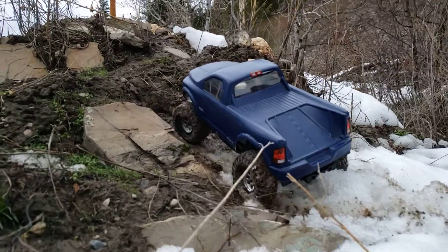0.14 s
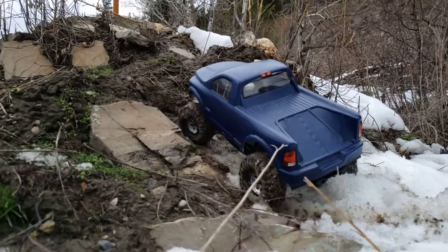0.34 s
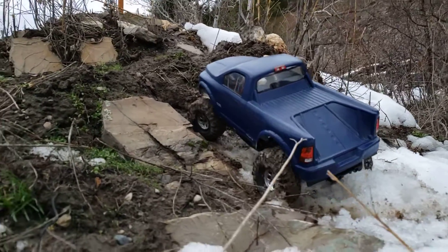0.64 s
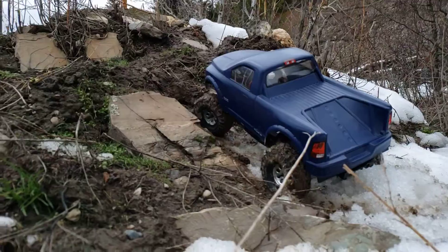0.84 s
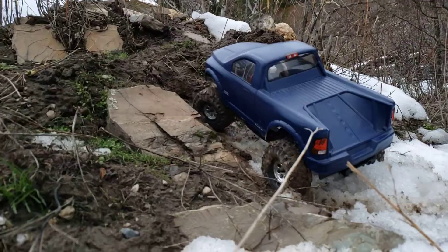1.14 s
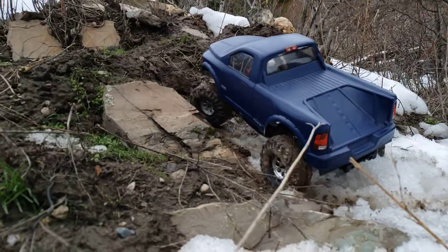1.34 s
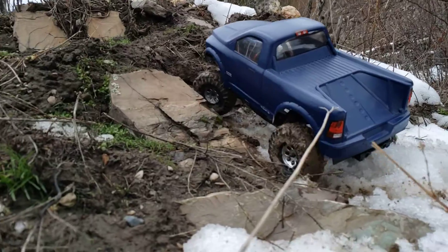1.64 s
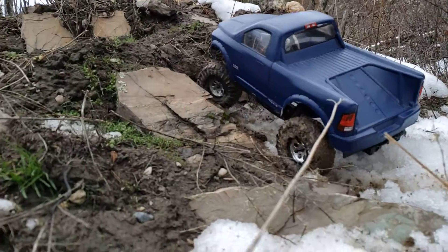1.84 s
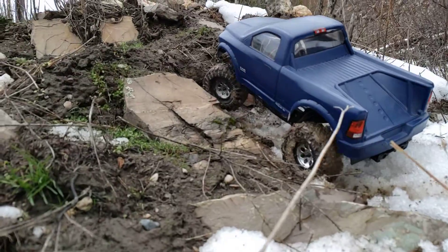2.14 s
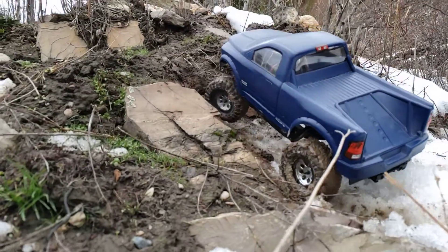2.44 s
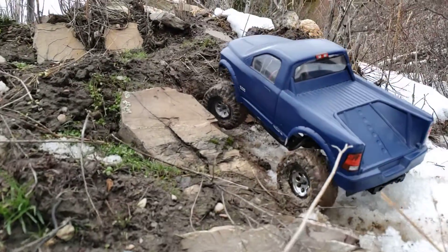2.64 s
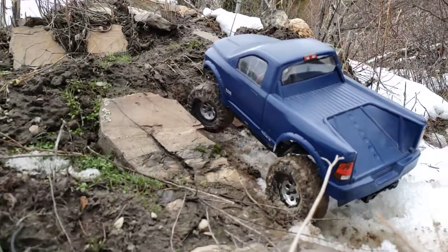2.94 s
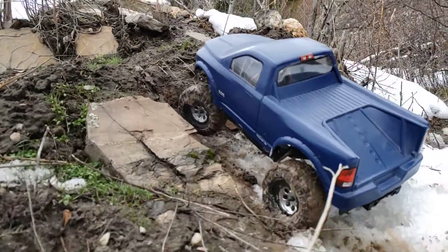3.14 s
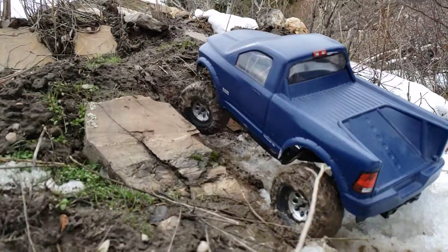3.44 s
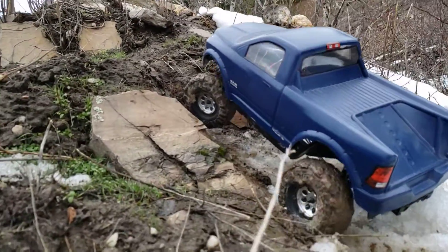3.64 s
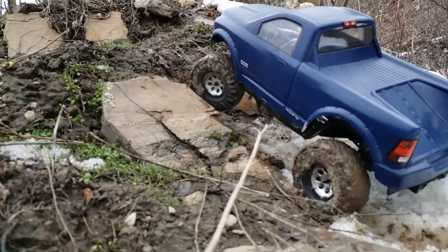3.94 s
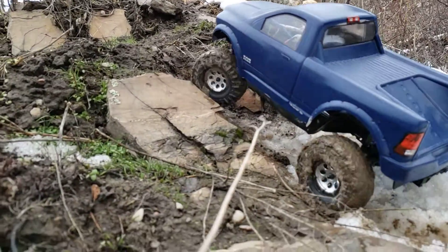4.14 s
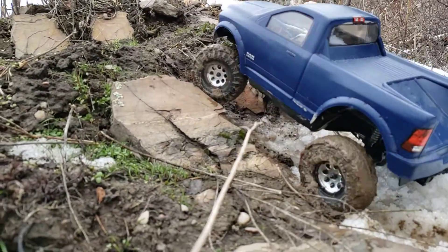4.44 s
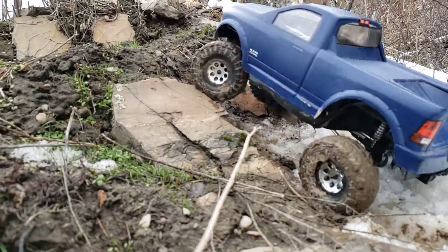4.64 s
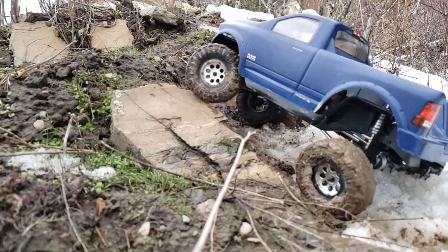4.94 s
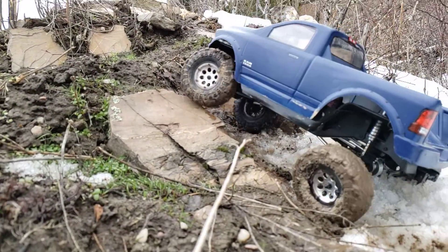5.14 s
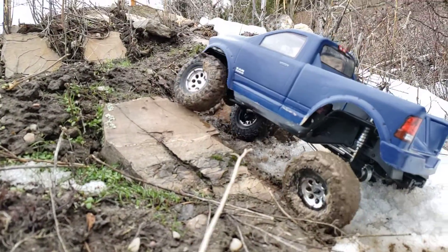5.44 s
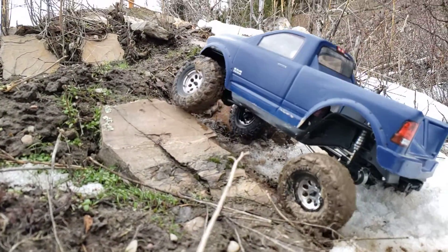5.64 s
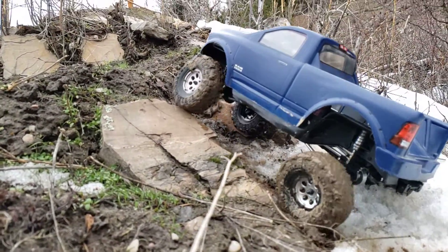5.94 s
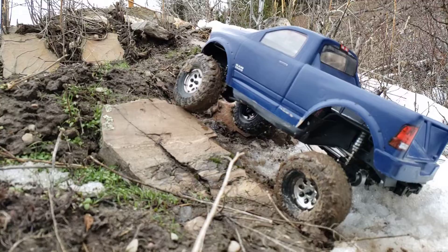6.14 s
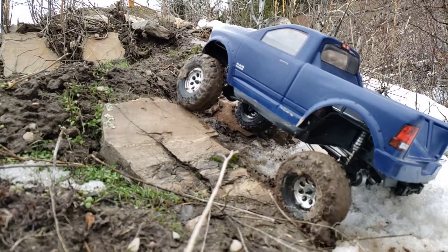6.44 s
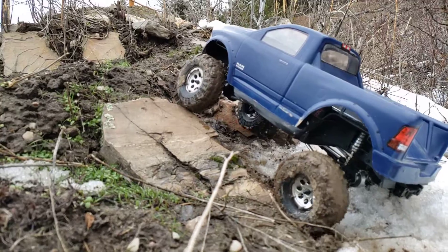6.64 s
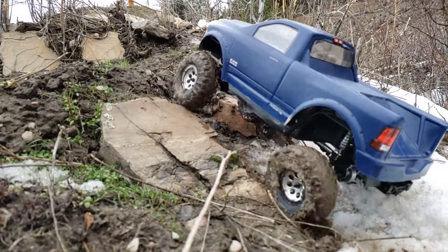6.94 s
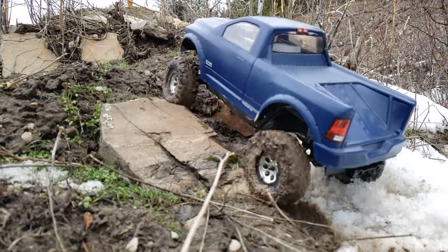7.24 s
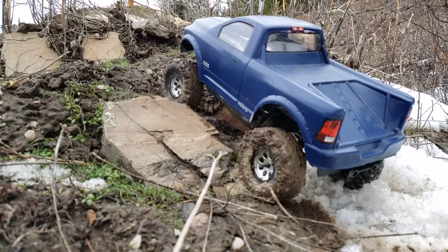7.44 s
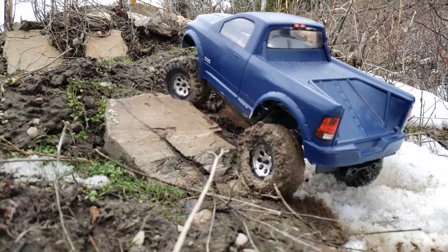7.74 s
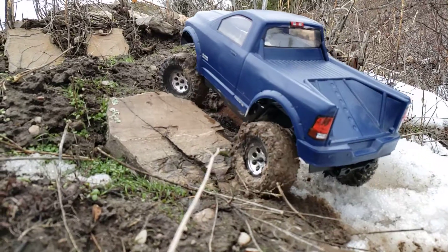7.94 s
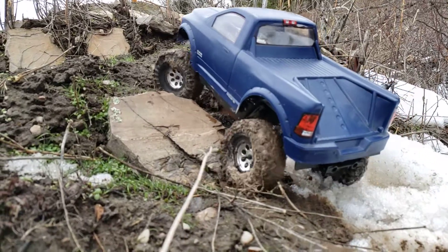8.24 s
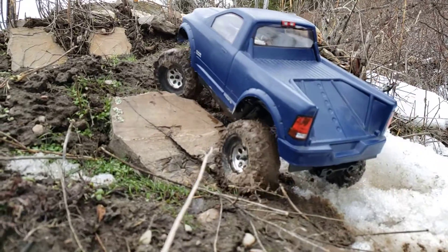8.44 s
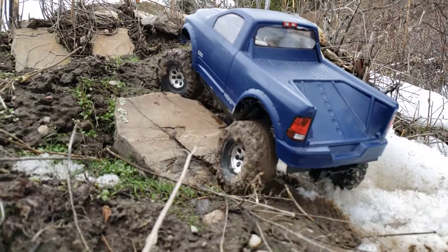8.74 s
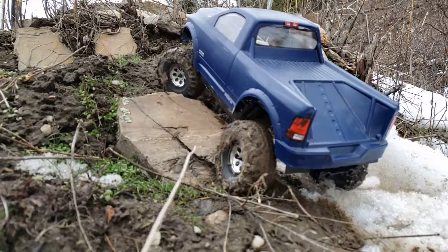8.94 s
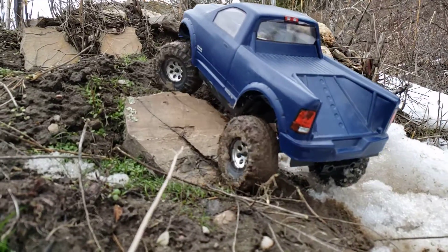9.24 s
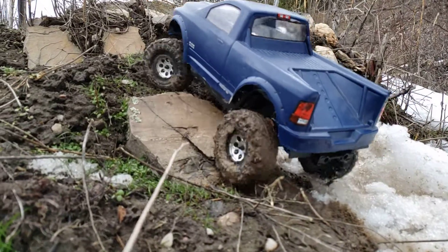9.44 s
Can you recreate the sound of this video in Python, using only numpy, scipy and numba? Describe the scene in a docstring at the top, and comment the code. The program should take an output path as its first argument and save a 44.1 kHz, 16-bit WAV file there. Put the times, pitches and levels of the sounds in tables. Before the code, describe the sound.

Close gritty gear whine of a toy crawler truck rises and sags in jerks, racing twice as tyres slip, with faint open-air rumble behind.

```python
"""Model truck on a rocky bank

A small electric model truck crawls up a muddy, rocky bank, close by. A moving tooth rate drives sine partials for the
whining gears and gated noise for their rattling case; every lurch of the drive train gives a short gritty rasp.
The motor can rings as band-passed noise, the speed controller sings at 1 kHz, and tyres scrub and knock on stone.
A far engine drones on two low sines under the coloured noise of the open air."""
import sys
import numpy as np
from scipy import signal
from scipy.fft import rfft, irfft
from scipy.io import wavfile
from scipy.ndimage import uniform_filter1d
from numba import njit

SR = 44100
rng = np.random.default_rng(int(sys.argv[2]) if len(sys.argv) > 2 else 0)


def transcribe(signal):
    """Save signal, clipped to [-1, 1], as a 16-bit WAV file at the path in sys.argv[1]."""
    frames = np.atleast_2d(signal).T
    limited = np.clip(frames, -1, 1)
    pcm = np.round(limited * 32767).astype(np.int16)
    wavfile.write(sys.argv[1], SR, pcm)


N = 422478
T = np.arange(N) / SR
CRAWL_HZ = 318.4  # tooth rate at crawling speed

# lurches of the drive train: t/s, relative strength/dB
LURCHES = [(0.108, 4.5), (0.157, -7), (0.212, 0.5), (0.254, 4.0), (0.386, -1), (0.576, 0.5), (0.736, 3),
           (0.796, -3.5), (0.905, 3), (0.95, -10), (1.062, 1), (1.24, 2.5), (1.359, 1.5), (1.502, 2),
           (1.55, 3), (1.62, 5), (1.686, -1.5), (1.779, 3), (1.827, -14), (1.888, -5), (1.947, -2),
           (2.0, -2), (2.031, 2.5), (2.202, 1.5), (2.358, -6), (2.527, 4.5), (2.7, 6.5), (2.807, -7),
           (2.857, 3), (2.968, 3), (3.143, 7), (3.332, -5), (3.389, -2.5), (3.507, 0.5), (3.939, -5.0),
           (3.991, -13), (4.039, 2.5), (4.088, 0.0), (4.177, 5.5), (4.222, -2), (4.269, -5.5), (4.309, 1),
           (4.358, 0), (4.404, -6), (4.453, 5), (4.563, 8), (4.681, 7), (4.783, 4.5), (4.892, 8),
           (4.932, 1), (4.981, -1), (5.028, 3.5), (5.152, 1), (5.201, 0), (5.37, 4), (5.579, 4.5),
           (5.639, -2), (5.781, 2.0), (5.846, -3.5), (5.983, 0.5), (6.034, -7), (6.097, -13), (6.161, 3),
           (6.288, -4.5), (6.357, -2), (6.468, -4.5), (6.557, -1), (6.659, 4), (6.728, -7), (6.771, -1),
           (6.804, 4), (6.853, -7), (6.892, -1), (6.927, 6.5), (6.991, 6), (7.068, 6), (7.143, 4.5),
           (7.215, 2.5), (7.29, 6), (7.378, 5), (7.86, -2), (7.959, -2.0), (8.013, 1), (8.069, -11),
           (8.107, 2), (8.164, -2), (8.22, -4), (8.263, 5), (8.374, 8), (8.487, 2), (8.636, 0.5),
           (8.801, 4), (8.846, 1), (8.925, 5), (8.999, 4.5), (9.133, 5), (9.208, 3.5), (9.296, 7),
           (9.379, 6), (9.447, 7.5), (9.52, -1)]


def undb(db):
    """Decibels to gain."""
    return 10 ** (np.asarray(db) / 20)


def unit(x):
    """Scale to rms 1."""
    return x / np.sqrt(np.mean(x ** 2))


def curves(table):
    """The columns of a time table, interpolated at every sample."""
    s, *columns = np.transpose(table)
    return [np.interp(T, s, c) for c in columns]


def walk(rate):
    """Smooth random wander with spread near 1, heading for a new value `rate` times a second."""
    k = int(SR / rate)
    steps = np.repeat(rng.standard_normal(N // k + 1), k)
    return 1.3 * uniform_filter1d(uniform_filter1d(steps, k), k)[:N]


def outline(hz, points):
    """Gain of a (Hz, dB) outline at the given frequencies, straight over log frequency."""
    at, db = np.transpose(points)
    return undb(np.interp(np.log(hz), np.log(at), db))


def colour(x, points):
    """Filter by a (Hz, dB) outline."""
    bins_hz = np.fft.rfftfreq(N, 1 / SR) + 1  # 1 Hz up, to keep the log finite
    return irfft(rfft(x) * outline(bins_hz, points), N)


def air_noise(apart_hz):
    """Noise at two ports: alike in the bass, unrelated well above apart_hz."""
    mid, side = rfft(rng.standard_normal((2, N)))
    alike = .97 / (1 + (np.fft.rfftfreq(N, 1 / SR) / apart_hz) ** 3)
    mid = mid * np.sqrt((1 + alike) / 2)
    side = side * np.sqrt((1 - alike) / 2)
    return irfft(np.array([mid + side, mid - side]), N)


def pan(left_db):
    """Gains of the two channels, the left one left_db above the right."""
    return undb(np.array([[left_db], [-left_db]]) / 2)


def ports(x):
    """The truck is to the right, and each port hears its treble with another colour."""
    # treble tilt between the ports: f/Hz, left minus right/dB
    port_tilt = [(2000, -6), (5000, -5.5), (7000, -15), (9500, 3), (11500, -3), (14000, -10.5)]
    return np.array([colour(c, [(hz, side * db / 2) for hz, db in port_tilt]) for c, side in zip(x, (1, -1))])


@njit
def svf(x, hz, width):
    """Band-pass whose centre may move every sample."""
    y, band, low = np.empty(len(x)), 0., 0.
    for i in range(len(x)):
        g, k = np.tan(np.pi * min(hz[i] / SR, .45)), width / hz[i]
        v = (band + g * (x[i] - low)) / (1 + g * (g + k))
        band, low, y[i] = 2 * v - band, low + 2 * g * v, k * v
    return y


def resonate(x, hz, width):
    """Both channels through one resonance, to rms 1."""
    return unit(np.array([svf(c, hz + np.zeros(N), float(width)) for c in x]))


def bell(age, width_s):
    """Smooth bump of height 1 around age 0."""
    return np.exp(-.5 * (age / width_s) ** 2)


def around(s, size=12000):
    """The samples near an event, and their age in s."""
    span = slice(max(int(s * SR) - size, 0), int(s * SR) + size)
    return span, T[span] - s


def jumps():
    """The load on the teeth at each lurch: a quick rise and a slower fall, as high as the lurch is strong."""
    lag_s, rise_s, fall_s = 0.011, 0.017, 0.022  # the load peaks just after the rasp
    load = np.zeros(N)
    for s, db in LURCHES:
        span, age = around(s + lag_s)
        bump = undb(db) * bell(age, np.where(age < 0, rise_s, fall_s))
        load[span] = np.maximum(load[span], bump)
    return load


def swells(width_s):
    """A short swell at every lurch, as strong as the lurch; the half-length may change over time."""
    power, width_s = np.zeros(N), width_s + np.zeros(N)
    for s, db in LURCHES:
        span, age = around(s)
        power[span] += (undb(db) * bell(age, width_s[span])) ** 2
    return np.sqrt(power)


def coasting():
    """Slack of the gears, growing towards 1 while the throttle is let go and then gone."""
    # spans with the throttle let go: start/s, end/s
    coasts = [(5.27, 5.35), (7.43, 7.8)]
    slack = sum((T < b) * np.sqrt(np.clip((T - a) / (b - a), 0, 1)) for a, b in coasts)
    return uniform_filter1d(slack, size=int(0.021 * SR))  # 21 ms soft edges


def tooth_gate(phase, depth):
    """Swells once per cycle of the phase."""
    return unit(np.exp(depth * np.cos(2 * np.pi * phase)))


def tooth_clicks(phase, ring_s=0.0047, scatter_db=4.0, count=6000, size=600):
    """One click of uneven strength per tooth, ringing briefly through the drive train to each port."""
    at = np.flatnonzero(np.diff(np.floor(phase)))
    clicks = np.zeros((1, N))
    clicks[0, at] = undb(scatter_db * rng.standard_normal(count))[:len(at)]
    left, right, shared = rng.standard_normal((3, size)) * np.exp(-T[:size] / ring_s)
    rings = np.array([left + shared, right + shared])
    return unit(signal.fftconvolve(clicks, rings, axes=1)[:, :N])


def mesh_note(phase, rough_db=2.5, smear=0.28, runout=0.33, count=15):
    """The tooth-rate note flutters with uneven teeth and sways once per turn of the 15-tooth pinion."""
    sway = runout * np.sin(2 * np.pi * phase / count)
    turn = 2 * np.pi * phase + smear * walk(220) + sway
    grip = undb(4.5 * np.tanh(walk(45)) - 1.5)  # the teeth bite and slacken
    return np.sqrt(2) * np.sin(turn) * grip * undb(rough_db * walk(150)) * pan(1.7)


def mesh_overtones(phase, hz, rough_db=2.5, smear=0.4, smear_growth=0.56, paths=0.8):
    """Upper partials come and go in the shell's resonances; the faster the teeth meet, the more they break up."""
    # partials of the tooth contact: multiple of the tooth rate, relative level/dB
    partials = [(2, -2.5), (3, -10), (4, -11), (5, -11.5), (6, -11), (7, -13), (8, -12.5), (9, -12),
                (10, -15.5)]
    # how the shell radiates them: f/Hz, gain/dB
    shell = [(330, 0), (425, 9), (480, 2), (560, 5.5), (670, -1.5), (790, 4), (950, -2.5), (1130, 1),
             (1260, -0.5), (1390, -3), (1550, -1), (1780, -4.5), (2030, 4), (2250, 4.5), (2750, -12),
             (3500, -10.5), (5000, -25)]
    out, chatter = 0, smear * (hz / CRAWL_HZ) ** smear_growth
    for k, db in partials:
        # a shared phase wobble, and a slower one of its own at each port
        wobble = chatter * walk(330) + paths * np.array([walk(50), walk(50)])
        grip_db = 6 * np.tanh(walk(40)) - 1.5
        gain = undb(db + grip_db + rough_db * walk(130))
        out = out + gain * np.sin(2 * np.pi * (k * phase + rng.uniform()) + wobble)
    return np.sqrt(2) * colour(out, shell) * pan(0.3)


def rattle(phase):
    """Teeth slap through their backlash and ring the case."""
    # gear case under the slap of the teeth: f/Hz, relative gain/dB
    case_tone = [(150, -34), (300, 11), (520, -3), (800, -4), (1050, 1.5), (1250, -9), (1550, 2.5),
                 (1800, -7.5), (1930, 0), (2060, 7), (2170, 2), (2330, -2), (2700, -5), (3400, -13),
                 (5000, -58), (9000, -48)]
    slaps = air_noise(680) * tooth_gate(phase, depth=0.2) * undb(3.6 * walk(60))
    return unit(colour(slaps, case_tone)) * pan(-4.0)


def panels(near_db):
    """Narrow resonances of the body, which turn towards the microphone or away as the truck climbs."""
    # buzzing body panels: f/Hz, width of each pass/Hz, relative level/dB, change per dB of nearness/dB
    body = [(428.95, 56, -8, 1.35), (1280, 60, -16.5, -1.5), (1555.5, 100, -15.5, 2.4),
            (2233.4, 240, -10, 1.6)]
    shake, out = air_noise(1000), 0
    for hz, width, db, turn in body:
        buzz = resonate(resonate(shake, hz, width), hz, width)
        out = out + undb(db + turn * near_db) * buzz
    return out


def rasps(clicks, speed_hz, hiss_db=5.0):
    """At each lurch the loaded teeth click and slide in a short burst, longer at speed."""
    # rasp of the teeth under load: f/Hz, relative gain/dB
    rasp_tone = [(1500, -15), (2150, 9), (3300, -10.5), (4300, -9), (5100, 4), (6000, 1), (7100, 1),
                 (8400, -7.5), (11000, -10), (15000, -17)]
    half_length_s = 0.0099 * (speed_hz / CRAWL_HZ) ** 0.83
    grating = clicks + undb(hiss_db) * rng.standard_normal((2, N))
    return undb(1) * swells(half_length_s) * unit(ports(colour(grating, rasp_tone)))


def can_ring(phase, flicker_db=2.3, buzz=0.32, choke_db=-1.5, count=5):
    """The motor can keeps ringing with a buzz; it swells around each lurch, bent sharp and damped at its
    height."""
    # ring of the motor can: t/s, level before trim and swell/dB
    ring_level = [(0, -64), (0.3, -65), (0.75, -57.5), (1.2, -55.5), (1.6, -53.5), (2.4, -58.5), (3.1, -57),
                  (3.7, -57), (4.1, -56), (4.9, -54.5), (5.3, -59.5), (6.5, -58.5), (7, -46.5),
                  (7.4, -51.5), (7.65, -60), (8.0, -59.5), (8.45, -51.5), (8.75, -61), (9.58, -46)]
    rest_hz, width_hz, pull_hz = 4895, 430, 1250
    rest_db, swell_s = -14, 0.026  # floor between lurches, half-length of each swell
    db, = curves(ring_level)
    # the chatter pulses once every five teeth
    chatter = rng.standard_normal((2, N)) * undb(flicker_db * walk(110)) * tooth_gate(phase / count, depth=buzz)
    bend = np.tanh(1.3 * swells(0.0075))
    hz = rest_hz + pull_hz * bend + 90 * walk(30)
    ring = resonate(resonate(chatter, hz, width_hz), hz, width_hz)
    swell = np.hypot(undb(rest_db), np.tanh(1.38 * swells(swell_s)))
    return undb(db + 2.5 + choke_db * bend) * swell * ring * pan(-5.0)


def scrub(clicks, click_db=-5.0):
    """Dense grains of grit, mixed with the clicks of the running gears."""
    # scrubbing grit: f/Hz, relative gain/dB
    grit = [(1500, -2), (3300, 1), (4300, 7), (5100, 7.5), (6000, 6), (7100, 8), (8400, 2.5), (11000, 4.5),
            (14000, 2.5), (15500, 5.5)]
    grains = rng.standard_normal((2, N)) * undb(1.8 * walk(900))
    mixed = (grains + undb(click_db) * clicks) * undb(1.6 * walk(90))
    return ports(unit(colour(mixed, grit)))


def slipping():
    """Strength of the tyres slipping on grit, with soft edges."""
    # tyre slips: start/s, end/s, level/dB
    slips = [(3.0, 3.063, -55.5), (4.543, 4.593, -56), (4.777, 4.831, -49.5), (4.884, 4.942, -54),
             (6.956, 7.414, -53.5), (6.981, 7.022, -38.5), (7.062, 7.104, -46), (7.116, 7.174, -40),
             (7.201, 7.246, -41), (8.997, 9.056, -50.5), (9.263, 9.326, -47.5), (9.366, 9.406, -43),
             (9.426, 9.486, -40.5), (9.491, 9.586, -36.5)]
    return uniform_filter1d(sum(undb(db) * ((T > a) & (T < b)) for a, b, db in slips), size=750)


def controller(near_db, level_db=-61.0):
    """The switched motor current makes the windings sing, louder as the truck comes side-on."""
    near = undb(level_db + 1.16 * near_db + walk(15))
    turn = 2 * np.pi * 1001.2 * T  # Hz
    note = np.sin(turn + np.array([[0], [.9]]))  # the right port hears another phase
    octave = undb(-8.0 + 1.4 * walk(7.3)) * np.sin(2 * turn)
    return near * np.sqrt(2) * (note + octave)


def knocks():
    """Short blows of tyres and loose stones: decaying bands of noise."""
    # knocks: t/s, starting level/dB, centre f/Hz, width/Hz, decay/s
    blows = [(2.9, -29.5, 160, 108, 0.013), (2.897, -44, 12500, 9900, 0.024), (3.006, -36, 160, 130, 0.062),
             (3.725, -42, 1241, 54, 0.018)]
    out, noise = 0, air_noise(920)
    for s, db, hz, width, decay in blows:
        age = np.maximum(T - s, 0)
        out = out + undb(db) * (T > s) * np.exp(-age / decay) * resonate(noise, hz, width)
    return out


def twig():
    """A dry stalk snaps under a tyre: a wide band of noise that decays in about a millisecond."""
    age = T - 2.8872
    crack = undb(-30.5) * (age > 0) * np.exp(-np.abs(age) / .0009)
    return crack * resonate(air_noise(2500), 1200, 7000)


def far_engine(throb=0.11, throb_hz=6.4):
    """Only the firing note and its octave carry this far; the note throbs gently and its pitch sinks a little."""
    # far engine: t/s, level of the firing note/dB
    drone = [(0.0, -58), (0.08, -50), (0.13, -43.5), (0.74, -43), (0.9, -34), (1.68, -27.5), (4.43, -35.5),
             (6.46, -33), (8.96, -36), (9.58, -40.5)]
    start_hz, end_hz, settle_s = 70.7, 67.2, 2.8
    db, = curves(drone)
    hz = end_hz + (start_hz - end_hz) * np.exp(-T / settle_s)
    turn = 2 * np.pi * np.cumsum(hz * (1 + 0.0028 * walk(10))) / SR
    beat = 1 + throb * np.sin(2 * np.pi * np.cumsum(throb_hz * (1 + 0.134 * walk(2.96))) / SR)
    note = undb(db + 0.16 * walk(22)) * beat * np.sin(turn + np.array([[.28], [0]]))
    octave = undb(-54 - 1.26 * T) * np.sin(2 * turn)  # fades by 1.26 dB a second
    return np.sqrt(2) * (note + octave) * pan(-1.3)


def open_air():
    """Broad noise of the open air, almost steady."""
    # open air: f/Hz, relative density/dB
    air_tone = [(20, -23), (50, 8), (90, 6.5), (170, -7.5), (420, -5.5), (700, -5), (1250, -14.5),
                (2100, -21.5), (3300, -75), (6000, -36), (10000, -32.5), (15300, -27)]
    return undb(-45.5 + 0.72 * walk(5)) * unit(colour(air_noise(550), air_tone))


def scene():
    """The truck over the drone and the open air; motor speed and nearness set the level of the drive."""
    # motor speed under throttle and load: t/s, tooth rate before cogging/Hz
    speed = [(0.0, 303), (0.065, 337.7), (0.1, 312.5), (0.224, 339), (0.33, 227.8), (0.42, 269.6),
             (0.5, 228), (0.579, 301), (0.639, 279.2), (0.738, 324), (0.868, 303), (0.958, 318.8),
             (1.068, 272.3), (1.152, 301.4), (1.242, 272.5), (1.407, 342.2), (1.502, 316.5), (1.591, 392.6),
             (1.656, 306.8), (1.711, 369), (1.771, 308), (1.831, 324), (1.956, 286), (2.025, 418.4),
             (2.085, 267), (2.21, 318.2), (2.24, 293.4), (2.33, 305), (2.36, 250.6), (2.519, 326.3),
             (2.619, 279), (2.749, 332), (2.933, 272.7), (2.953, 301), (3.073, 317), (3.133, 285.5),
             (3.153, 313.4), (3.203, 291), (3.228, 251), (3.312, 293.6), (3.447, 284), (3.482, 251.2),
             (3.537, 280), (3.672, 208.8), (3.756, 224.4), (3.881, 206.8), (3.926, 225), (3.981, 322),
             (4.151, 375), (4.215, 343), (4.235, 397), (4.28, 381), (4.315, 304.6), (4.41, 338.4),
             (4.455, 299), (4.555, 422.8), (4.605, 386.8), (4.684, 408), (4.724, 375), (4.749, 445),
             (4.779, 472.2), (4.829, 419.7), (4.989, 378.6), (5.11, 240.5), (5.21, 286.4), (5.3, 204.4),
             (5.38, 257.7), (5.44, 237.2), (5.51, 191.8), (5.58, 252.5), (5.73, 212), (5.8, 255.2),
             (5.9, 214.8), (6.02, 279.7), (6.11, 249.8), (6.18, 288), (6.27, 238.4), (6.37, 261.7),
             (6.48, 225.5), (6.57, 292.6), (6.605, 279.5), (6.645, 355.6), (6.695, 336), (6.775, 428),
             (6.849, 414.7), (6.984, 499.4), (7.009, 583), (7.039, 556.3), (7.119, 626), (7.134, 720),
             (7.169, 703), (7.194, 626.6), (7.244, 640), (7.263, 562), (7.388, 509.7), (7.468, 309.7),
             (7.55, 235), (7.79, 240), (7.842, 262.3), (7.922, 315.6), (7.987, 303), (8.012, 331.5),
             (8.146, 294.2), (8.166, 330), (8.271, 327.7), (8.391, 402), (8.431, 342.8), (8.526, 311),
             (8.62, 338), (8.73, 272.7), (8.8, 365), (8.85, 345), (8.89, 437.4), (8.965, 461.6),
             (8.99, 535.4), (9.039, 513.3), (9.069, 405.8), (9.124, 493), (9.159, 443.3), (9.244, 465.3),
             (9.284, 627.6), (9.339, 569.3), (9.394, 679), (9.424, 630), (9.493, 703), (9.528, 886),
             (9.58, 844)]
    # level gained as the truck comes closer and side-on: t/s, gain/dB
    nearness = [(0, -4.5), (2, 0), (3.5, 2), (6, 3.5), (8.3, 1.9), (9.58, 4.5)]
    # chassis resonances that the tooth-rate note passes through: f/Hz, base level/dB
    chassis = [(220, -62.5), (265, -52.5), (295, -49.5), (324, -41), (345, -44), (370, -45.5), (400, -40),
               (428, -37.5), (470, -40.5), (520, -43), (600, -41.5), (680, -48), (860, -38)]
    speed_hz, = curves(speed)
    near_db, = curves(nearness)
    slack_db = -7.5 * coasting()
    # the drive grows 5.5 dB for each octave of speed
    effort_db = -53 + 5.5 * np.log2(speed_hz / CRAWL_HZ) + slack_db
    kick = jumps()
    hz = speed_hz * (1 + .012 * walk(85))  # the motor cogs a little
    phase = np.cumsum(hz) / SR  # in teeth
    clicks = tooth_clicks(phase + 0.07 * walk(400))  # backlash makes each tooth early or late

    whine_db = slack_db - 0.093 * near_db + 1.5 * (kick - 1)
    whine = outline(hz, chassis) * undb(whine_db) * mesh_note(phase)
    overtones = undb(effort_db + 0.68 * near_db + 1.2 * kick) * mesh_overtones(phase, hz)
    case = undb(effort_db + near_db - 1.5 + 1.1 * kick) * rattle(phase)
    body = undb(effort_db + 0.79 * kick) * panels(near_db)
    grating = undb(effort_db + slack_db + 0.61 * near_db) * rasps(clicks, speed_hz)
    drive = whine + overtones + case + body + grating + can_ring(phase)

    rolling = undb(effort_db + 0.89 * near_db - 5 + kick + 1.56 * walk(25))
    tyres = (rolling + slipping()) * scrub(clicks)
    return drive + tyres + controller(near_db) + knocks() + twig() + far_engine() + open_air()


def record(dry):
    """The recorder cuts the top steeply above 15.7 kHz."""
    return signal.sosfilt(signal.ellip(12, .2, 80, 15700, fs=SR, output="sos"), dry)


dry = scene()
out = record(dry)
transcribe(out)
```